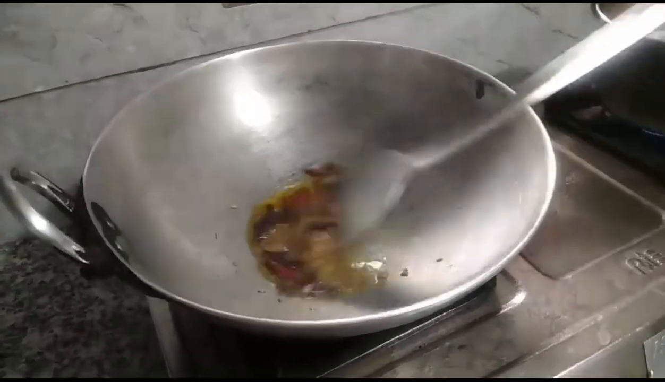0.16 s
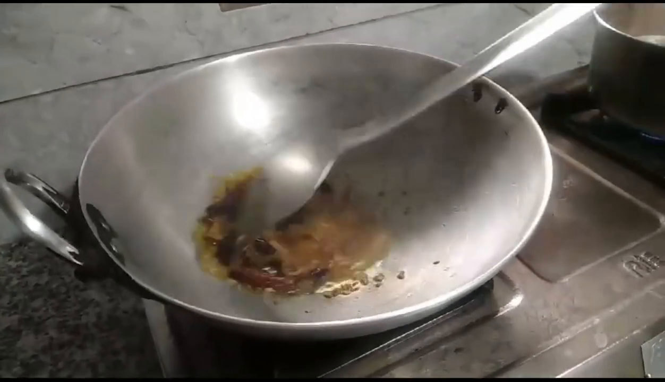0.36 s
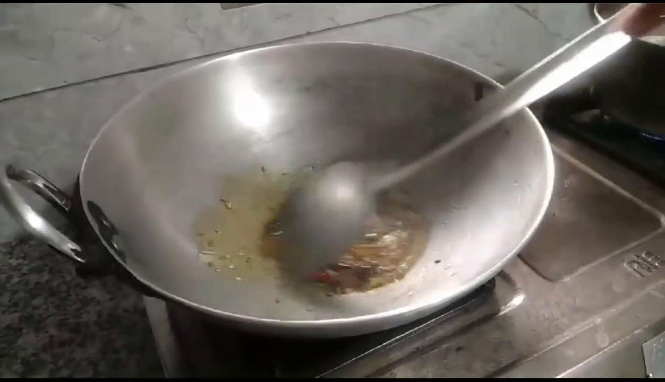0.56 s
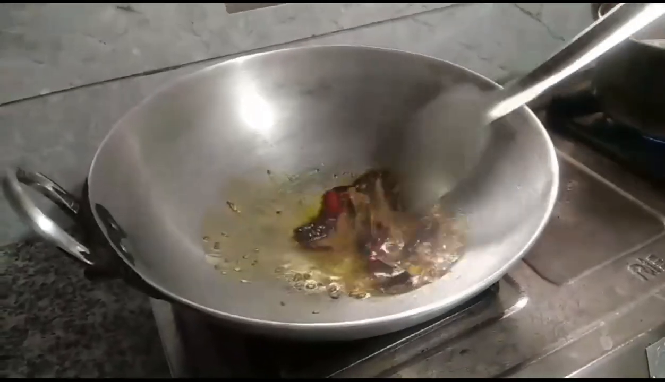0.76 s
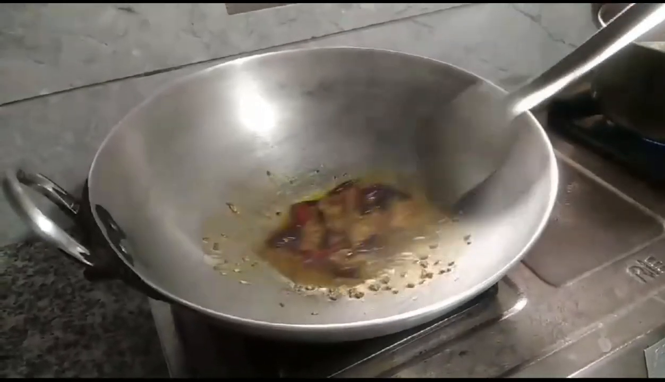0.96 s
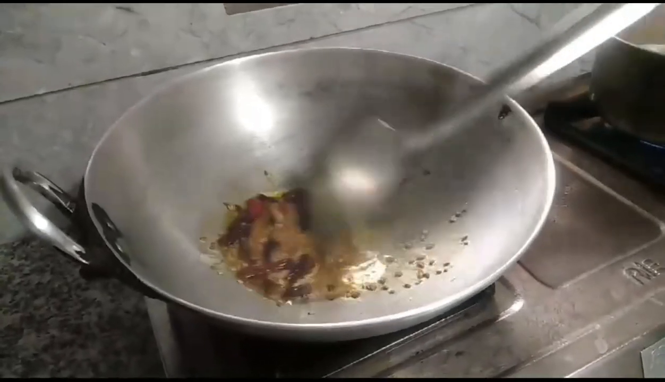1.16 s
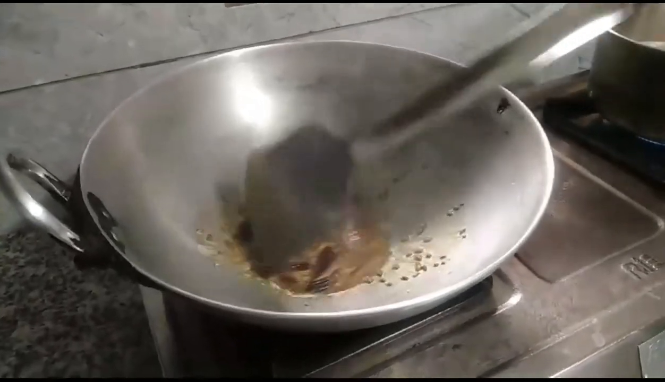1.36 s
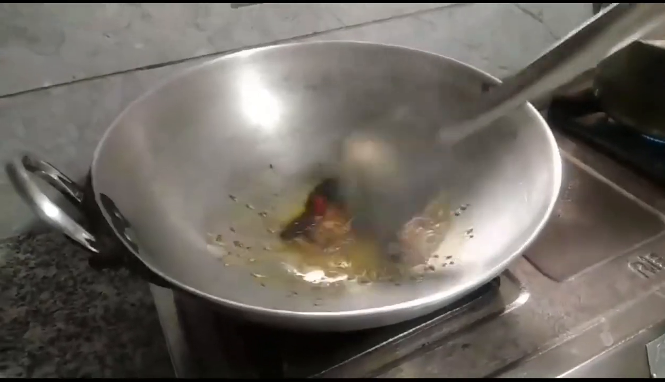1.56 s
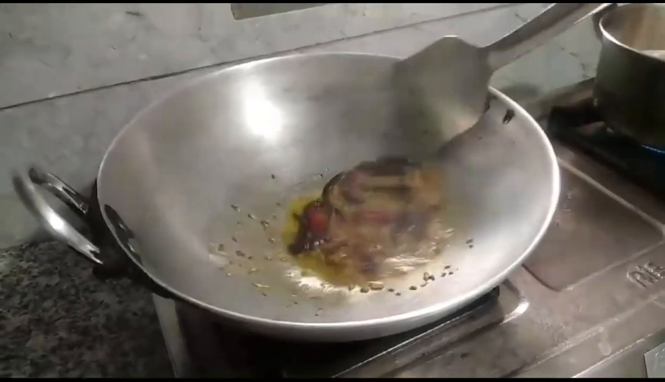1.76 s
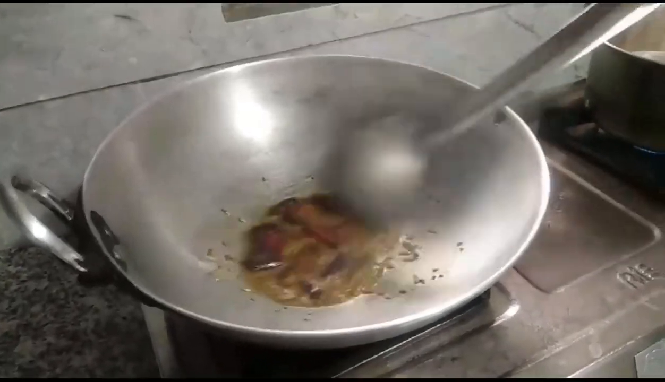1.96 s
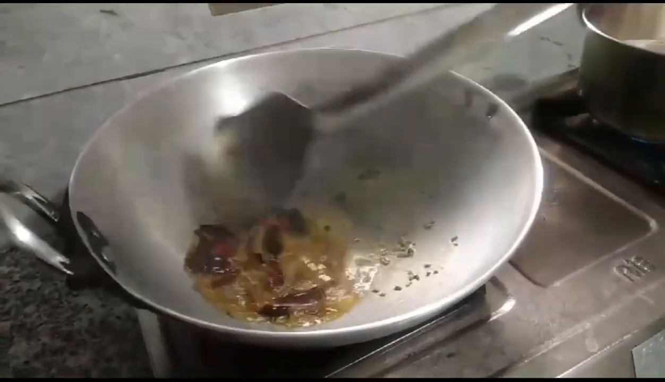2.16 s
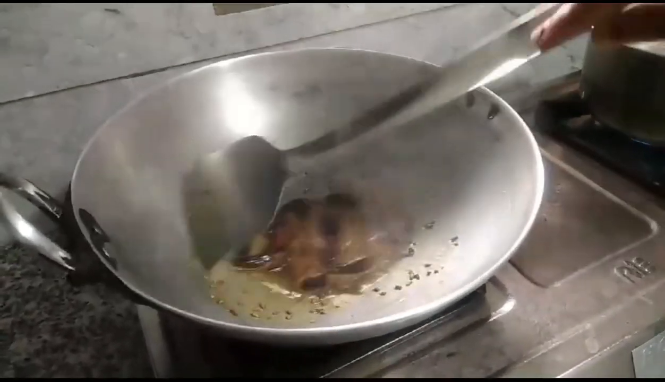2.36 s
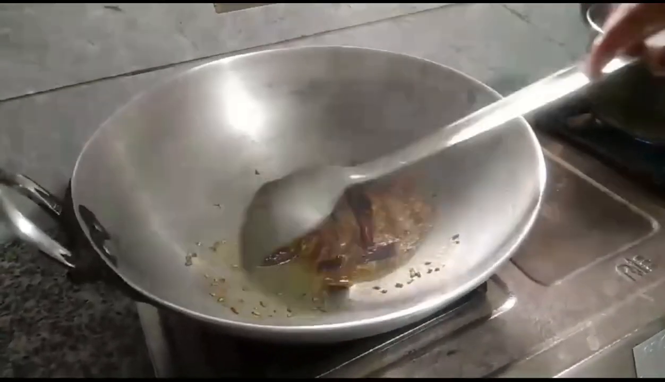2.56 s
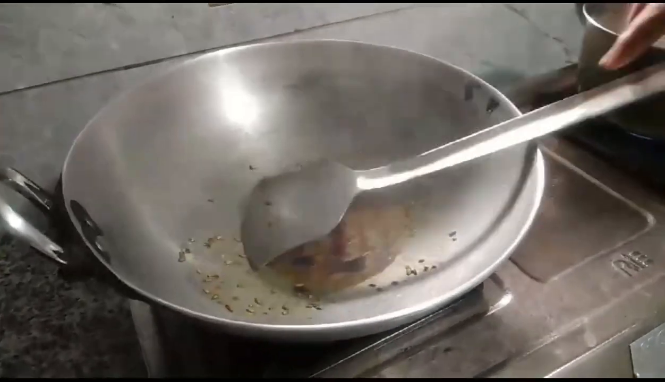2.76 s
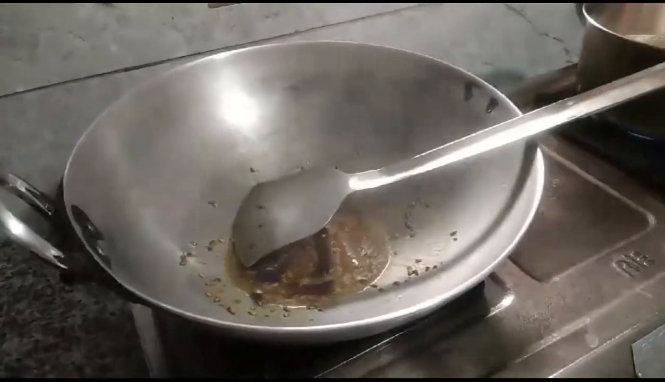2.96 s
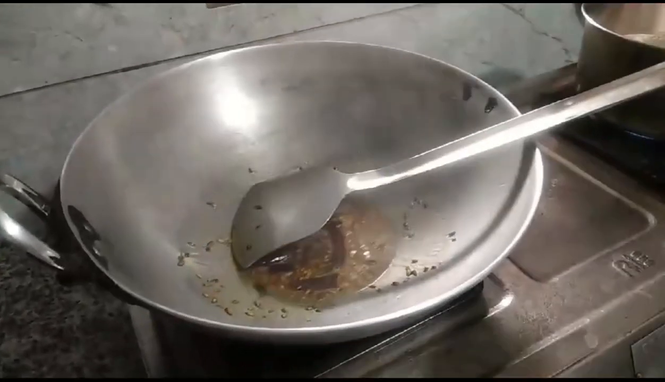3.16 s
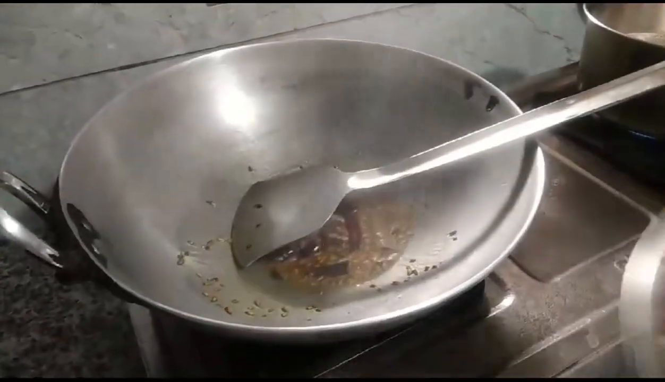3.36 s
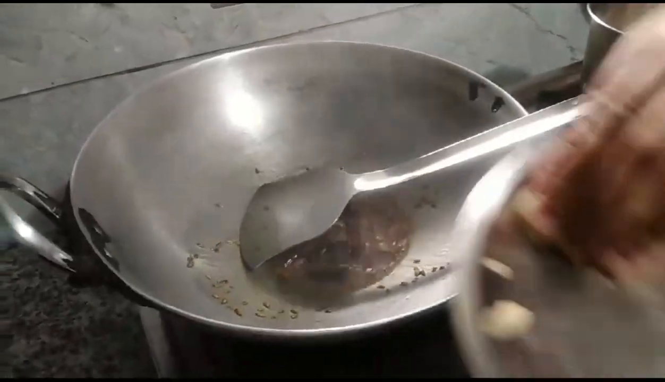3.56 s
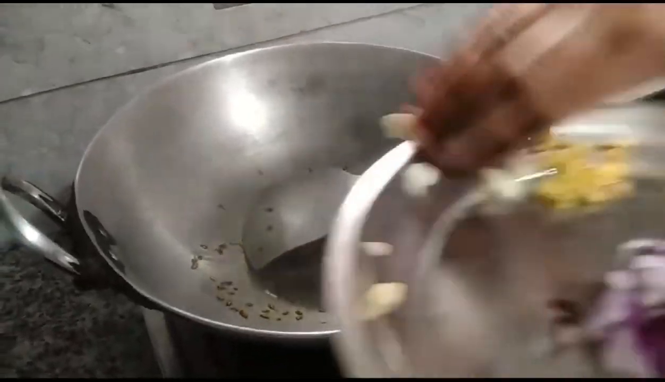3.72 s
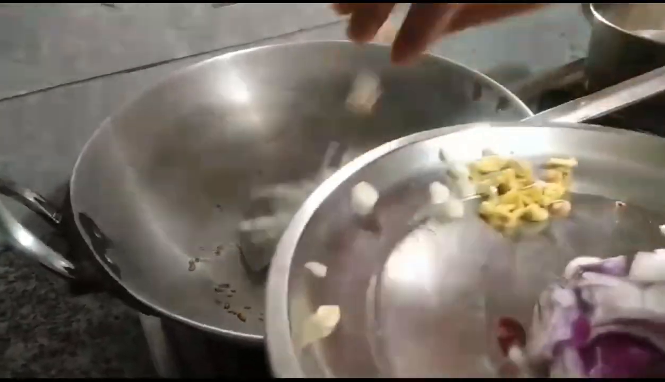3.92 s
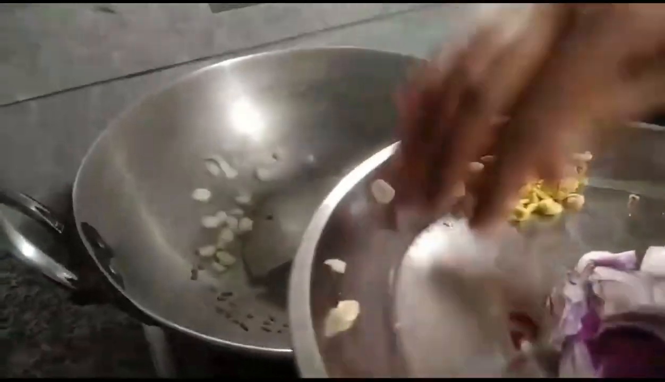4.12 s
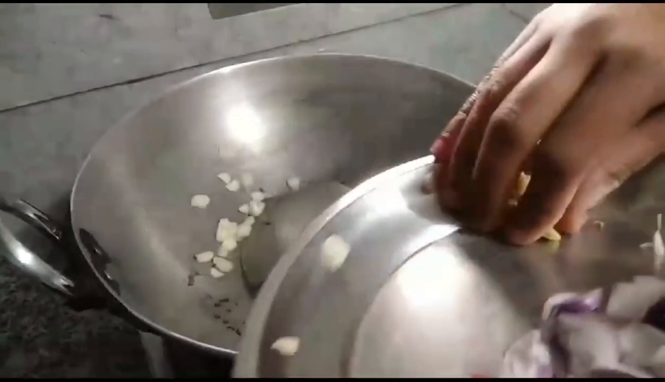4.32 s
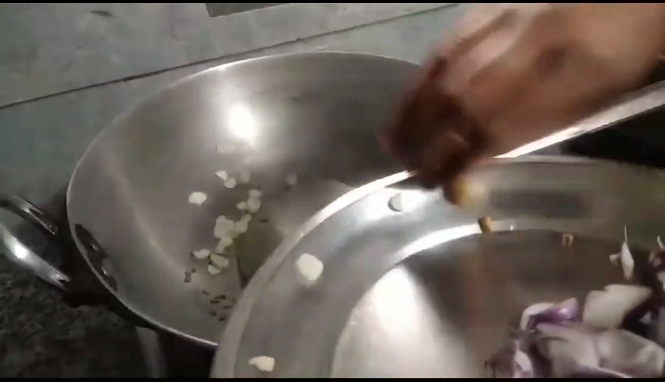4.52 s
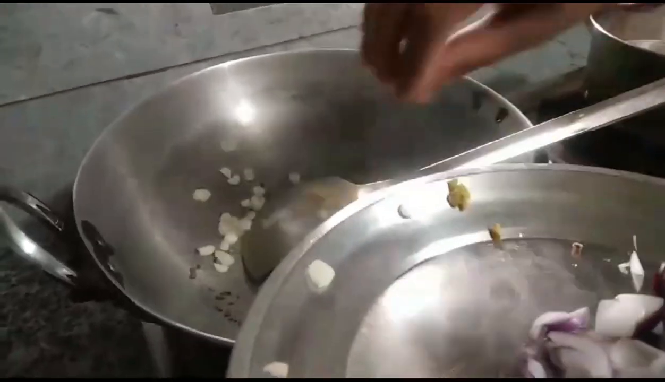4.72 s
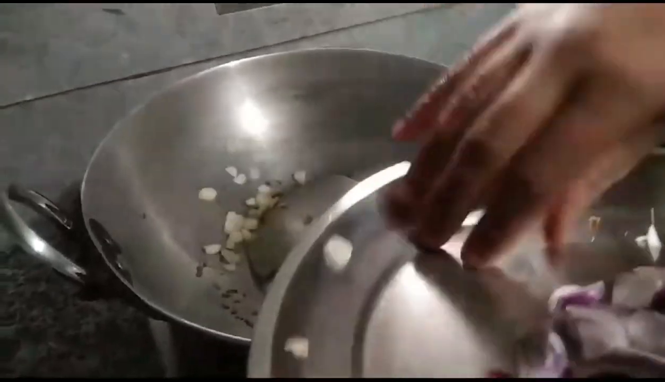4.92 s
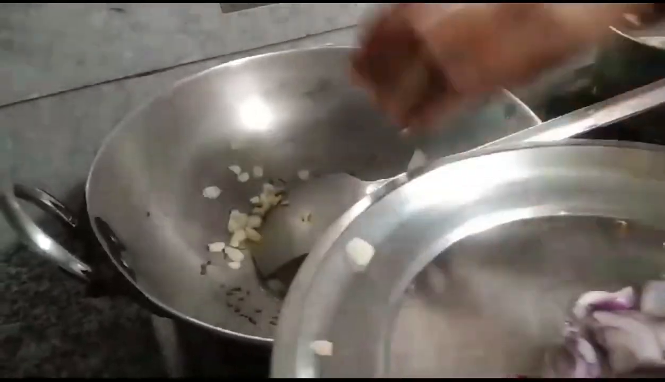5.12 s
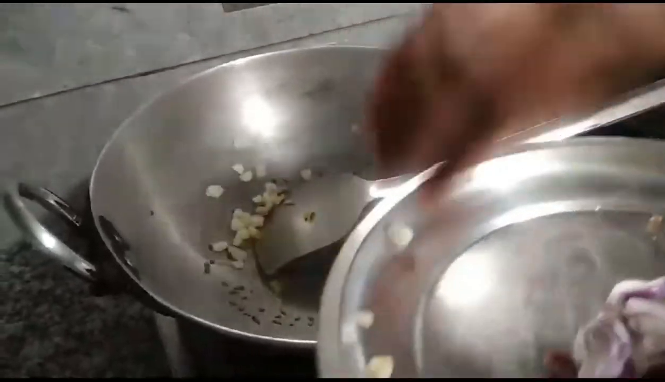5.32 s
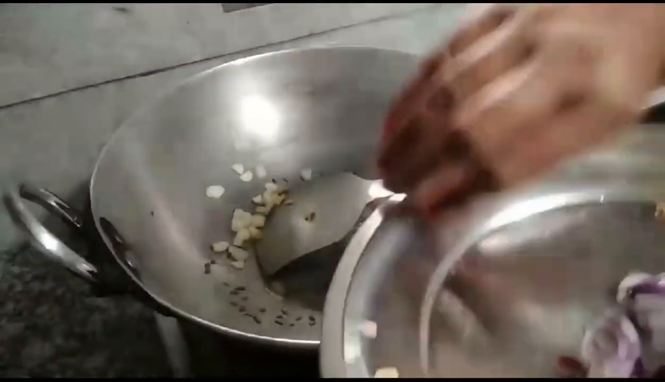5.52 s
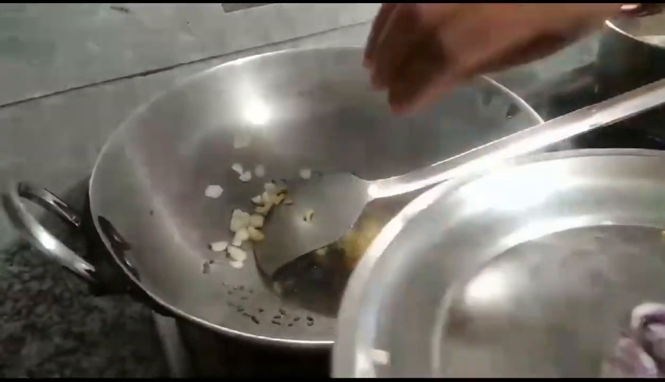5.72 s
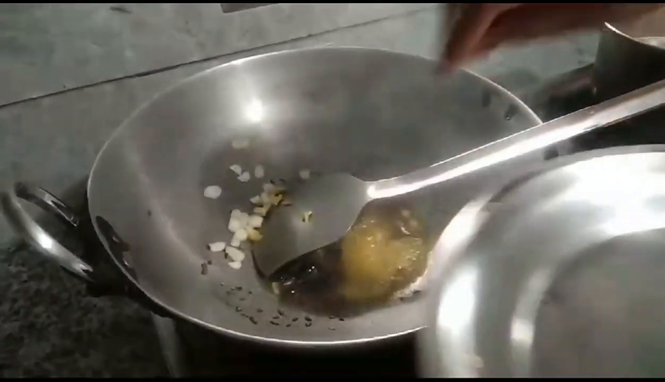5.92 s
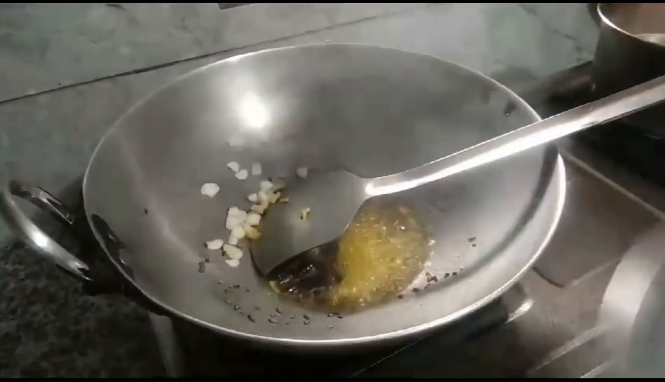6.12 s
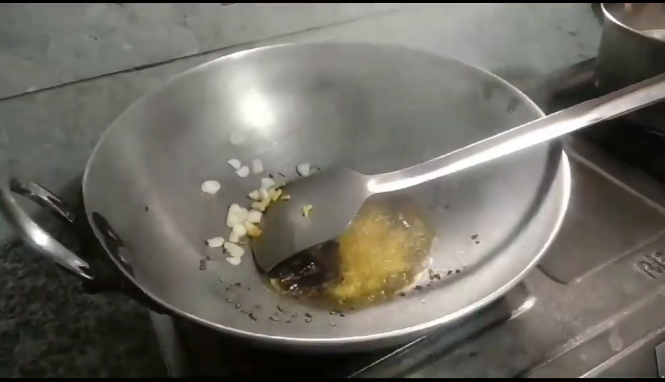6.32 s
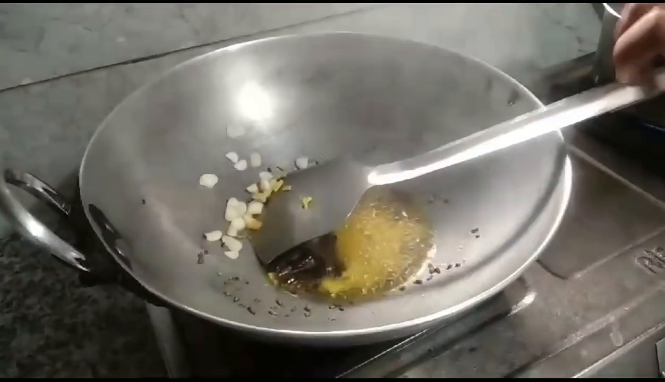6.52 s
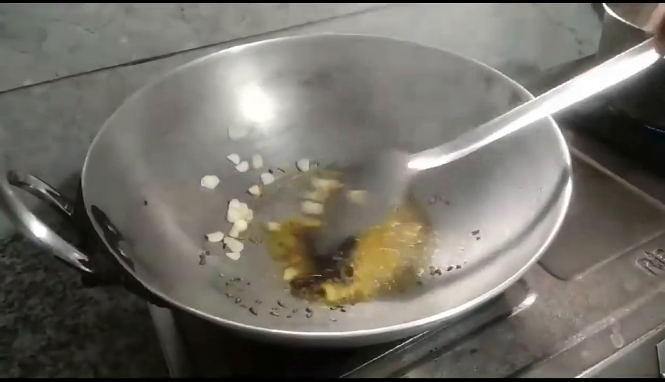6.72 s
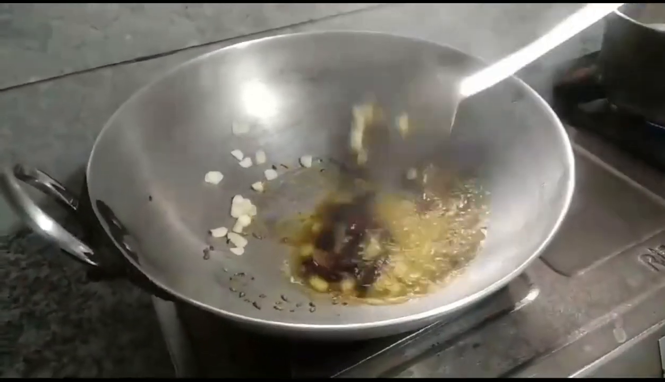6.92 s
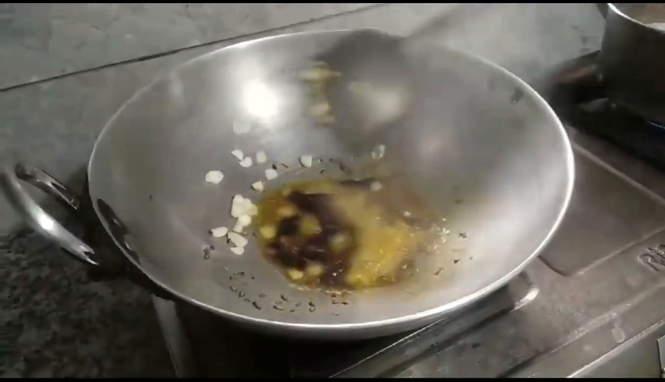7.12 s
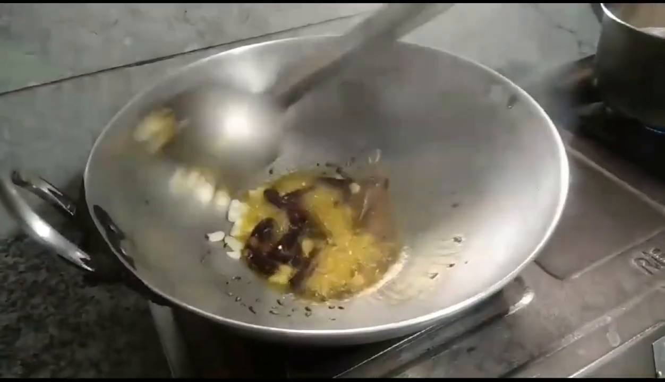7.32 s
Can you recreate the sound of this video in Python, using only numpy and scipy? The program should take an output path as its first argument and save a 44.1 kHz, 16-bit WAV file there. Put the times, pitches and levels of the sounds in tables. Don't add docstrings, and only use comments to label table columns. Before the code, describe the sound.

Close to a steel wok in a tiled kitchen, oil fizzes while a spatula strikes and scrapes the metal with bright, short rings. The handle drops and rattles on the rim, then the fizz thins. Chopped pieces go in with light taps, and sizzling swells with many sharp pops. A steel plate scrapes harshly over stone before stirring clinks return. A soft burner and faint low rumble lie behind, in close stereo with little tail.

```python
import sys
import numpy as np
from scipy import signal
from scipy.fft import rfft, irfft, next_fast_len
from scipy.io import wavfile
from scipy.ndimage import uniform_filter1d

SR = 44100
rng = np.random.default_rng(int(sys.argv[2]) if len(sys.argv) > 2 else 0)


def to_wav(s):
    ch = np.atleast_2d(s).T
    pcm = np.round(np.clip(ch, -1, 1) * 32767)
    wavfile.write(sys.argv[1], SR, pcm.astype(np.int16))


def volts_from_db(level):
    exponent = np.asarray(level, float) / 20
    return 10 ** exponent


N = 329868


def evened(x):
    return x / np.sqrt(np.mean(x ** 2) + 1e-20)


def times(size):
    return np.arange(size) / SR


def read(points, hz):
    f, value = np.transpose(points)
    return np.interp(np.log(hz + 1), np.log(f + 1), value)


def curves(rows):
    s, *columns = np.transpose(rows)
    t = np.arange(s[0], s[-1], 1 / SR)
    return s[0], [np.interp(t, s, c) for c in columns]


def add(mix, s, sound):
    part = mix[:, round(s * SR):][:, :sound.shape[1]]
    part += sound[:, :part.shape[1]]


def pan(db):
    return volts_from_db(np.array([[db / 2], [-db / 2]]))


def paired(x, same):
    same = np.clip(same, -1, 1)
    return np.array([x[0], same * x[0] + np.sqrt(1 - same ** 2) * x[1]])


def hiss(size, same):
    return paired(rng.standard_normal((2, size)), same)


def grains(size, per_s, spread_db, same):
    click_db = spread_db * np.minimum(rng.exponential(1, size), 5)
    happens = rng.random(size) < per_s / SR
    return evened(hiss(size, same) * volts_from_db(click_db) * happens)


def slow(size, span):
    return evened(uniform_filter1d(uniform_filter1d(rng.standard_normal(size), span), span))


def coloured(x, spectrum, peaks=(), wide_db=0):
    size = next_fast_len(x.shape[1])
    hz = np.fft.rfftfreq(size, 1 / SR)
    gain = volts_from_db(wide_db) + sum(volts_from_db(db) / (1 + 2j * (hz - f) / w) for f, w, db in peaks)
    return evened(irfft(rfft(x, size) * gain * volts_from_db(read(spectrum, hz)), size)[:, :x.shape[1]])


def elsewhere(modes, spread_db):
    luck = rng.standard_normal((len(modes), 2))
    return [(hz * (1 + 0.0056 * a), w, db + spread_db * b) for (hz, w, db), (a, b) in zip(modes, luck)]


def wandering(x, spectrum, modes, wide_db):
    turn = np.pi / 4 + 1.2 * slow(x.shape[1], 1500)
    a = coloured(x, spectrum, elsewhere(modes, spread_db=2.5), wide_db)
    b = coloured(x, spectrum, elsewhere(modes, spread_db=2.5), wide_db)
    return np.cos(turn) ** 2 * a + np.sin(turn) ** 2 * b


def strike(t60, touch):
    t = times(SR // 3)
    return (1 - np.exp(-(t / max(touch, 1e-4)) ** 2)) * volts_from_db(-60 * t / max(t60, .01))


# (frequency [Hz], level [dB per Hz])
RUMBLE = [(7.1, -31), (12, 6), (27, -11), (43, -1.5), (68, 4.5), (79, -2.5), (92, -11.5), (129, -5),
          (182, -21.5), (200, -14.5), (260, -40), (440, -120)]
# (frequency [Hz], level [dB per Hz])
BURNER = [(88, -25), (150, -9.5), (210, -27.5), (267, -2.5), (318, -15.5), (389, -0.5), (475, -5),
          (658, -3.5), (983, -18), (1140, -8), (1730, -22), (2450, -7), (3000, -20), (3900, -51),
          (6600, -120)]


def kitchen():
    rumble_db = -56.5 - 1.1 * times(N)
    rumble = volts_from_db(rumble_db) * coloured(hiss(N, 0.93), RUMBLE)
    roar = coloured(hiss(N, 0.96), BURNER, [(382.0, 9.2, 4.7), (450, 2.0, 0.7)])
    flame_db = -61.5 + .7 * slow(N, 9000)
    return rumble + volts_from_db(flame_db) * roar


# (time [s], pitch [Hz], level [dB])
MOTOR = [(0.0, 59.4, -45.5), (0.69, 59.2, -72), (0.97, 63.3, -43), (1.65, 62.4, -63), (3.47, 71.86, -53),
         (4.6, 59.6, -70)]


def hum():
    s, (hz, db) = curves(MOTOR)
    out = np.zeros((2, N))
    add(out, s, volts_from_db(db - 1.0) * np.sin(2 * np.pi * np.cumsum(hz) / SR) * pan(2.2))
    return out


def walls(x):
    t = times(SR // 3)
    tail = rng.standard_normal((2, len(t))) * volts_from_db(-60 * t / 0.19) * (t > .004)
    return signal.fftconvolve(x, tail / np.linalg.norm(tail[0]), axes=1)[:, :N]


# (time of crest [s], scrape level [dB], rise [s], fall [s])
SLIDES = [
    [(5.916, -32, 0.016, 0.056), (6.02, -37.5, 0.027, 0.073), (6.088, -35, 0.064, 0.035),
     (6.15, -36, 0.046, 0.057), (6.21, -43, .02, .03), (6.262, -42.5, .008, 0.044)],
    [(6.385, -44.5, 0.034, 0.11), (6.48, -28.5, 0.043, 0.064), (6.53, -30, 0.072, 0.04)],
]
# (frequency [Hz], width [Hz], level [dB])
PLATE = [(563, 210, -1), (1052, 76, 1.5), (1385, 33, -2), (1685, 77, -2), (2130, 150, -3.5), (2400, 29, -3),
         (2550, 55, 4), (2870, 34, 6), (3040, 110, -0.5), (3520, 64, -2), (3930, 65, 2), (4240, 97, -1),
         (4780, 130, 1.5), (5100, 49, 2)]
# (frequency [Hz], level [dB per Hz])
SCRAPE = [(59, -52), (130, -16.5), (260, -2), (468, -32), (526, -7), (1200, -8), (1320, 1), (1850, -2.5),
          (2500, -8.5), (4200, -5), (7150, -22), (12100, -120)]


def plate():
    out = np.zeros((2, N))
    for pushes, screech_db in zip(SLIDES, (1, 4)):
        t = pushes[0][0] - .1 + times(round(.6 * SR))
        power = 0
        for s, db, rise, fall in pushes:
            decay = np.where(t < s, ((s - t) / rise) ** 2, (t - s) / fall)
            power = power + (volts_from_db(db) * np.exp(-decay)) ** 2
        slip = hiss(len(t), .3) + volts_from_db(-6) * grains(len(t), 1500, 3.0, .4)
        sound = wandering(slip, SCRAPE, PLATE, wide_db=-6.5)
        sound = sound + volts_from_db(-10.0) * coloured(slip[::-1], BUBBLING)
        sound = sound + volts_from_db(-8.5) * coloured(paired(slip, 0.95), BURNER)
        sound = sound + volts_from_db(screech_db) * coloured(slip, STEEL)
        add(out, t[0], volts_from_db(2.0) * np.sqrt(power) * sound * pan(1.3))
    return out


# (time [s], frequency [Hz], level [dB], t60 [s])
RINGS = [(0.15, 1540, -47.5, 0.57), (0.28, 1195, -50, 0.35), (1.012, 2000, -62, 0.67),
         (1.48, 166.5, -54.5, 0.89), (1.87, 168, -55.5, 0.6), (2.102, 1855, -71, 0.24),
         (3.7, 2197, -57, 0.33), (3.623, 7380, -46, 0.36), (3.622, 9620, -45, 0.35),
         (3.622, 12200, -47, 0.34), (4.7, 155, -45, 0.1), (6.385, 430, -36, 0.41), (6.011, 1370, -27, 0.42),
         (6.2, 1930, -38, 0.6), (6.0, 2100, -46, .5), (1.1, 1850, -45, 0.27), (6.58, 788, -43.5, 1),
         (7.125, 703, -41, 0.68), (7.141, 165, -57, 0.78)]


def rings():
    out, t = np.zeros((2, N)), times(SR // 3)
    for s, hz, db, t60 in RINGS:
        waver = 0.8 + 0.5 * slow(len(t), 200)
        add(out, s, volts_from_db(db) * strike(t60, 0.0049) * waver * np.sin(2 * np.pi * hz * t) * np.ones((2, 1)))
    return out


# (time [s], peak [dB], centre [Hz], t60 [s], left-right [dB])
TAPS = [(0.2936, -28.5, 4340, 0.034, 4), (0.2993, -28.5, 4200, 0.041, 4), (.975, -36.5, 4200, 0.4, 2),
        (0.475, -38, 3930, 0.14, 2.5), (0.591, -44.5, 880, 0.13, -5), (0.748, -45, 4880, 0.15, 9),
        (0.909, -37, 2920, 0.29, -0.5), (1.195, -35, 2400, 0.099, 1), (3.343, -30.5, 2400, 0.048, -0.5),
        (3.617, -41.5, 2800, 0.08, 3), (3.645, -43.5, 2700, 0.19, 1), (3.93, -53, 1800, 0.5, 2),
        (3.984, -46.5, 1300, 0.22, 4), (4.055, -41.5, 2300, 0.16, 6), (5.042, -28.5, 2160, 0.065, -2),
        (5.248, -34.5, 2240, 0.17, -3), (5.7, -25.5, 4140, 0.055, -1), (7.1, -39, 1490, 0.43, -4),
        (7.115, -35, 2300, .1, 0)]


def taps():
    out = np.zeros((2, N))
    for s, db, hz, t60, side_db in TAPS:
        shape = [(hz / 4, -24), (hz * 0.94, -5), (hz, 0), (hz * 0.72, -3), (hz * 3, -22)]
        burst = coloured(hiss(SR // 3, 0.2), shape, WOK_MIDDLE, wide_db=2.0)
        add(out, s - .001, volts_from_db(db - 0.5) * pan(side_db) * strike(t60, 0.00075) * burst)
    return out


# (time [s], rattle level [dB], low part relative [dB])
RATTLE = [
    (2.807, -17, -20),
    (2.9, -18.5, -13.5),
    (2.98, -23, -16),
    (3.09, -61.5, 3.5),
]
# (time [s], peak over the rattle [dB])
BOUNCES = [(2.8079, 8.5), (2.812, -3), (2.8387, -4), (2.843, 7.5), (2.856, 6), (2.878, 4), (2.893, 4.5),
           (2.933, -9), (2.9687, -2)]
# (frequency [Hz], width [Hz], level [dB])
SPATULA = [(2830, 35, -9), (3150, 36, -10), (4570, 120, -3), (6230, 110, -5), (6830, 31, 1), (7150, 46, 1),
           (8040, 50, -9), (8630, 100, -5), (9350, 25, -8), (9530, 51, -6), (10800, 39, -11),
           (11200, 41, -17), (11800, 33, 2), (13000, 34, -9)]
# (frequency [Hz], level [dB per Hz])
SPATULA_LOW = [(71, -51), (120, -13), (313, -10.5), (371, -1.5), (608, -13.5), (662, -4), (1270, -5.5),
               (2750, -3), (3500, -20), (4550, -35), (7700, -120)]
# (time [s], [(frequency [Hz], width [Hz], level [dB])])
SHIFTING = [
    (2.83, [(2380, 120, -1.5), (2830, 53, 4), (3230, 46, -2), (3980, 96, -7), (4300, 38, -6), (4570, 41, -2), (5200, 28, -4), (5880, 80, 0)]),
    (2.92, [(1810, 34, 0), (2470, 77, -12), (3100, 92, -5), (3950, 150, -5), (4250, 36, -12), (4500, 130, -2), (5200, 34, 3), (5600, 26, 7)]),
    (3.0, [(2170, 95, -4), (2830, 130, -13), (3180, 67, -7), (3520, 75, 0), (4100, 24, -1), (4680, 62, 2), (5240, 27, 0), (5610, 57, -6)]),
]


def dropped_spatula():
    s, (db, low_db) = curves(RATTLE)
    t = s + times(len(db))
    kicks = 0
    for at, peak_db in BOUNCES:
        kicks = kicks + volts_from_db(peak_db) * np.exp(-np.clip(t - at, 0, 1) / 0.0071) * (t >= at)
    shake = hiss(len(t), 0.22) + volts_from_db(-7) * grains(len(t), 700, 3.0, .5)
    sound = wandering(shake, STEEL, SPATULA, wide_db=-10.5)
    middle_shape = [(900, -20), (2000, 0), (6000, 0.5), (9000, -13)]
    for at, modes in SHIFTING:
        rock = np.exp(-((t - at) / 0.059) ** 2)
        sound = sound + volts_from_db(-10) * rock * coloured(shake, middle_shape, modes, wide_db=-19)
    sound = sound + volts_from_db(low_db) * coloured(shake, SPATULA_LOW, KNOCK, wide_db=-2)
    sound = sound + volts_from_db(-24) * coloured(shake[::-1], BUBBLING)
    out = np.zeros((2, N))
    add(out, s, volts_from_db(db - 2.0) * (1 + kicks) * sound * pan(0.21))
    return out


# (frequency [Hz], level [dB], t60 [s]); a scrape up the wok wall
SCRAPED = [(633, -12, 0.11), (1850, -7.5, 0.3), (2150, -11, 0.15), (2560, -11, 0.13), (3460, -11.5, 0.37),
           (3700, -14, .16), (3962, -6, 0.25), (4500, -17, .2), (4800, -6, .25), (5222, -4, .07),
           (5800, -8, 0.13), (6400, 1, .12), (6500, -6, 0.23)]
EDGE_ON = [(574, -17, 0.18), (897, -4.5, 0.097), (1114, -3, 0.09), (1300, -5, 0.081), (1746, -12, 0.11),
           (2590, -14, 0.3), (2950, -21, 0.41), (3680, -19, 0.52), (4830, 3, 0.09), (5310, 4, 0.095),
           (5749, -11, 0.1), (6550, -2, 0.13), (7180, -3, 0.11), (7750, 3, 0.15)]
FLAT_ON = [(385.6, -19, 0.36), (624, -10, .1), (836, -0.5, 0.067), (1010, -0.5, 0.06), (1920, -14, 0.1),
           (2643, -19, 0.34), (2896, -14, 0.29), (4550, 1, .05), (5140, -12, .2), (5378, 3, .05),
           (5760, -9, .05), (6300, -2, 0.092), (6643, -8, .2)]
LIFTED = [(814, 7.5, 0.03), (1240, -4, .05), (2400, 1, 0.063), (2700, -8, .06), (3800, -3, .04)]
LATE = [(1800, -8, .2), (2120, 5.5, .1), (2900, -3, 0.16), (3490, -13, 0.45), (3680, -7, 0.14),
        (3970, 5.5, 0.14), (4441, -10, 0.16), (4850, -13, 5.0), (5560, -8, 0.32), (5750, -3, 0.42)]
SETTLING = [(595, 3.5, 0.4), (431, -4, 0.47)]
TIPPED = [(4200, 8, 0.091), (4900, -5, .08), (3400, -6, .08), (2800, -13, 0.094)]
# (time [s], level [dB], contact [s], modes)
CHIMES = [
    (.026, -26.5, 0.017, SCRAPED),
    (.2965, -50, .002, TIPPED),
    (1.505, -29, 0.0029, EDGE_ON),
    (2.428, -23, 0.0018, FLAT_ON),
    (3.342, -38.5, 0.0018, LIFTED),
    (6.355, -32, 0.014, [(441, 0, .5)]),
    (7.108, -27, 0.01, LATE),
    (7.37, -45, .02, SETTLING),
    (7.44, -39, 0.014, [(763, 0, .4)]),
]


def chimes():
    out, t = np.zeros((2, N)), times(SR // 3)
    for s, db, touch, modes in CHIMES:
        ring = 0
        for hz, mode_db, t60 in modes:
            start, apart = rng.random(2)
            phase = start + np.array([[0], [.2]]) * apart
            waver = 1 + 0.77 * slow(len(t), 150)
            tone = np.sin(2 * np.pi * (hz * t + phase))
            ring = ring + volts_from_db(mode_db) * strike(min(t60, .5), touch) * waver * tone
        add(out, s, volts_from_db(db) * ring)
    return out


# (time [s], peak [dB], low knock [dB], t60 [s], middle [dB])
CLINKS = [(0.0353, -9.5, -31, 0.15, -51), (1.0012, -15.5, -36, 0.14, -20.5),
          (1.5054, -14.5, -19, 0.11, -14), (1.872, -25, -34, 0.3, -15.5), (1.892, -20, -38, 0.55, -13.5),
          (2.2144, -23, -63, 0.12, -24), (2.4288, -8.5, -18, 0.11, -16.5), (2.516, -25.5, -22, 0.25, -11.5),
          (2.5688, -24.5, -23.5, 0.2, -3), (2.644, -35.5, -19, 0.28, -2), (3.552, -44, -30, 0.17, -17),
          (3.621, -36.5, -29, 0.34, -20), (4.0094, -35.5, -33, 0.24, -6), (6.3061, -25.5, -24, 0.13, -13),
          (6.966, -18, -47, 0.067, -4), (7.119, -8, -32.5, 0.14, -10.5), (7.41, -20.5, -47, 0.12, -15)]
# (frequency [Hz], level [dB per Hz])
STEEL = [(2350, -58), (4000, -11.5), (4260, -16), (4490, -14.5), (5380, -4.5), (7020, -1.5), (7720, 0.5),
         (8400, 3), (14200, -12)]
# (frequency [Hz], width [Hz], level [dB])
WOK_UPPER = [(5920, 140, -7), (6750, 110, -12), (6970, 31, -41), (7310, 77, -2), (8270, 120, -8),
             (7960, 43, -7), (8100, 18, 5), (8200, 38, -51), (9470, 39, 1.5), (9240, 10, 7),
             (11800, 59, -7), (11100, 28, -25), (12200, 130, -5)]
# (frequency [Hz], width [Hz], level [dB])
WOK_MIDDLE = [(1800, 19, -13), (2340, 33, -21), (2653, 63, -8.5), (2990, 74, -11.5), (3510, 54, -5),
              (3926, 47, -4.5), (4440, 140, 0.5), (4910, 70, 8)]
# (frequency [Hz], width [Hz], level [dB])
KNOCK = [(397, 19, 6.5), (642, 92, 3.5), (830, 99, -32), (1140, 230, -7)]


def clinks():
    out, t, touch = np.zeros((2, N)), times(SR // 3), .004
    low_shape = [(180, -17), (380, 1.5), (1250, -5.5), (2100, -17)]
    side = pan(-0.5)
    for s, db, low_db, t60, mid_db in CLINKS:
        shake = hiss(len(t), 0.18)
        grit = shake + volts_from_db(-9.5) * grains(len(t), 900, 3.0, 0.89)
        top = coloured(grit, STEEL, elsewhere(WOK_UPPER, spread_db=4), wide_db=1.0)
        middle = coloured(shake, BUBBLING, elsewhere(WOK_MIDDLE, spread_db=3), wide_db=-10)
        low = coloured(paired(shake, 0.86), low_shape, elsewhere(KNOCK, spread_db=8.5), wide_db=-7.5)
        ring = top + volts_from_db(mid_db - 2.0) * middle + volts_from_db(low_db + 7.5) * low
        tick = volts_from_db(4.0) * np.exp(-((t - touch) / 0.00037) ** 2)
        add(out, s - touch / 2, volts_from_db(db - 3.0) * side * (strike(t60, touch) * ring + tick * top))
        lead_db = min(-14 - (low_db + 26.0), -6)
        lead = volts_from_db(lead_db) * np.exp((t[:1300] - t[1300]) / 0.0041)
        add(out, s - t[1300], volts_from_db(db) * side * lead * ring[:, -1300:])
    return out


# (time [s], peak [dB], left-right [dB])
SNAPS = [(0.157, -26, -3), (0.1626, -21, 1), (0.6529, -24, 10), (1.437, -18, -11), (1.4413, -12, 9),
         (1.6372, -18, 6), (1.639, -24, 0), (2.4285, -30, 0), (2.8057, -13, -8), (3.175, -28, -2.5),
         (3.1786, -24, 8), (4.1563, -18, 0), (4.2005, -22, 0), (4.28, -16, 2), (4.4386, -15, 0),
         (6.3579, -11, -1), (6.9647, -22, -4)]


def snaps():
    out, t = np.zeros((2, N)), np.arange(-40, 40) / SR
    crack = np.exp(-(t / 0.00019) ** 2) * np.sin(2 * np.pi * 8900 * t + 1.4)
    for s, db, side_db in SNAPS:
        add(out, s, volts_from_db(db + 4.0) * pan(side_db) * crack)
    return out


# (time [s], peak [dB], left-right [dB])
POPS = [(0.1575, -11, 1.5), (0.1627, -26, -2), (0.654, -25.5, 0), (1.4366, -25, 3), (1.4415, -17.5, -2),
        (1.633, -22.5, 2), (1.6384, -25, -1), (1.7326, -35, 12), (3.1744, -21.5, -1), (3.178, -24, 5),
        (3.734, -29, 0), (3.741, -21.5, 2), (4.186, -16, 1), (4.194, -20, 0), (4.269, -19.5, -5),
        (4.328, -17, 0), (4.438, -44, -8), (4.515, -22.5, -4), (4.5479, -16.5, 0), (4.891, -16, 4),
        (4.931, -17, -1), (5.029, -18.5, 5), (5.1392, -15.5, -1), (5.245, -20.5, 0), (5.4097, -16.5, 1.5),
        (5.509, -18, 0), (5.561, -16.5, -4), (5.608, -20.5, -2), (6.357, -24.5, 2), (7.005, -22, -2),
        (7.357, -32, 4)]


def pops():
    out, t = np.zeros((2, N)), times(SR // 6)
    highpass = signal.butter(2, 1500, "high", fs=SR, output="sos")
    snap = volts_from_db(1) * np.exp(-((t - .0006) / .0003) ** 2)
    shape = strike(0.073, .0009)[:len(t)] + snap
    for s, db, side_db in POPS:
        spray = hiss(len(t), 0.036) + volts_from_db(-8) * grains(len(t), 1500, 2.4, 0.23)
        burst = signal.sosfilt(highpass, shape * coloured(spray, [(300, -65)] + FIZZ))
        add(out, s - .0006, volts_from_db(db - 7.5) * pan(side_db) * burst)
    return out


# (time [s], fizz level [dB])
HEAT = [(0.0, -43.5), (0.14, -36.5), (0.27, -52.5), (0.37, -43), (0.56, -44.5), (1.12, -42), (2.04, -46),
        (2.48, -44.5), (2.64, -65), (2.79, -60), (3.1, -54), (3.9, -60.5), (4.03, -41.5), (4.19, -36),
        (4.4, -33.5), (6.39, -36.5), (7.2, -37), (7.48, -29.5)]
# (frequency [Hz], level [dB per Hz])
FIZZ = [(710, -18.5), (1200, -18), (1290, -14), (1650, -23.5), (2010, -8.5), (2950, -10.5), (5370, -5.5),
        (6890, -3), (8650, 5), (10700, -3), (13600, -7), (14200, -8.5)]
# (frequency [Hz], level [dB per Hz])
BUBBLING = [(200, -44), (500, -2.5), (900, -8.5), (1800, 7.5), (3000, 4), (4500, -2), (7000, -25)]


def frying():
    s, (fizz_db,) = curves(HEAT)
    size = len(fizz_db)
    coarse_db = -11 - 0.03 * (fizz_db + 36)
    clump_db = 1.57 * slow(size, 900) + 0.21 * slow(size, 60)
    steam = hiss(size, 0.013)
    fizz = coloured(steam + volts_from_db(-6) * grains(size, 3500, 2.7, 0.1), [(300, -80)] + FIZZ)
    coarse = coloured(steam[::-1] + volts_from_db(-6) * grains(size, 1500, 2.7, 0.17), BUBBLING)
    coarse = volts_from_db(coarse_db - 10.0 + 3.35 * slow(size, 700)) * coarse
    out = np.zeros((2, N))
    add(out, s, volts_from_db(fizz_db + clump_db + 4.5) * (fizz + coarse))
    return out


def scene():
    blows = plate() + rings() + taps() + dropped_spatula() + chimes() + clinks() + snaps() + pops()
    return kitchen() + hum() + volts_from_db(-2.5) * walls(blows) + blows + frying()


# (frequency [Hz], level under neighbours [dB])
DROP_BELOW = [(600, -50), (1200, -4), (5000, -6), (8000, -3), (14000, -4.5)]
# (frequency [Hz], share dropped)
HOLE_SHARE = [(700, 0), (1400, .13), (3000, .13), (5500, .11), (7000, .004), (11000, .01), (14000, .05)]


def thinned(x):
    hz, t, z = signal.stft(x, SR, nperseg=2048, noverlap=1536)
    power = uniform_filter1d(abs(z) ** 2, size=3, axis=2) + 1e-20
    near = uniform_filter1d(power, size=3, axis=1)
    around = uniform_filter1d(power, size=24, axis=1)
    margin_db = 10 * np.log10(near / around + 1e-9) - read(DROP_BELOW, hz)[:, None]
    luck = rng.random((len(t) // 4 + 1, len(hz) // 9 + 1))
    luck = luck.repeat(4, 0).repeat(9, 1)[:len(t), :len(hz)].T
    level = np.log10((abs(z) ** 2).sum((0, 1)) + 1e-12)
    need = np.clip(1 + 3 * (level - uniform_filter1d(level, 60)), .9, 2.2)
    kept = (luck > np.outer(read(HOLE_SHARE, hz), need)) / (1 + np.exp(-margin_db / .8))
    attack = np.roll(level, -2) - np.roll(level, 2) > 1.8
    attack |= np.roll(attack, 1) | np.roll(attack, 2) | np.roll(attack, -1)
    return signal.istft(z * np.where(attack, 1, kept), SR, nperseg=2048, noverlap=1536)[1][:, :N]


# (frequency [Hz], twice the left-right difference [dB])
LEFT = [(60, -4.5), (180, 0.5), (550, -2.5), (1650, 9.5), (4970, 3.5), (15000, 7.5)]


def microphone(dry):
    size = next_fast_len(N)
    hz = np.fft.rfftfreq(size, 1 / SR)
    z = rfft(.8 * np.tanh(dry / .8), size)
    apart = np.clip(0.4 + (hz / 1100) ** 2 + (25 / (hz + 1)) ** 2, 0, 1)
    z = z.mean(0) + apart * (z - z.mean(0))
    lag_s = [0.000278, 0]
    z = z * volts_from_db(np.outer([.25, -.25], read(LEFT, hz))) * np.exp(-2j * np.pi * np.outer(lag_s, hz))
    edge = volts_from_db(-np.clip((hz - 14250) * 0.085, 0, 90))
    body = irfft(z * edge, size)[:, :N]
    top = irfft(z * (1 - edge) * (hz < 16450), size)[:, :N]
    cracking = np.minimum(3 * uniform_filter1d(1. * (snaps()[0] != 0), size=200), 1)
    return thinned(body) + volts_from_db(-24) * top * cracking


def top_cut(x):
    return signal.sosfilt(signal.butter(12, 16450, fs=SR, output="sos"), x)


def record(dry):
    mix = microphone(dry)
    return top_cut(mix)


dry = scene()
out = record(dry)
to_wav(out)
```